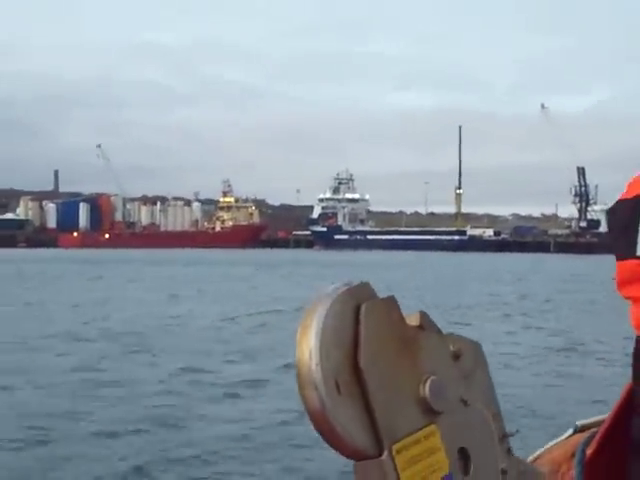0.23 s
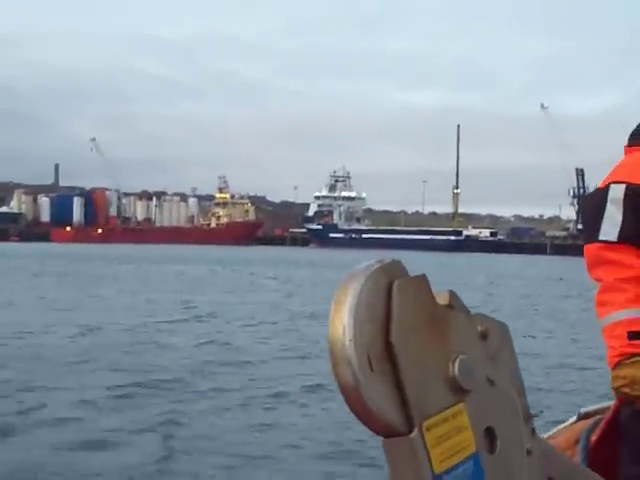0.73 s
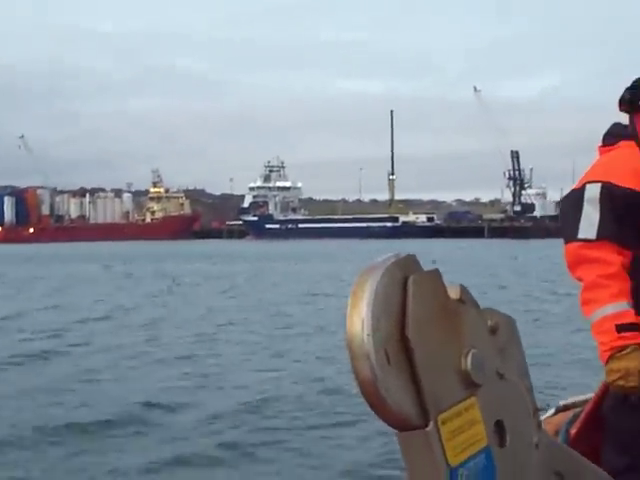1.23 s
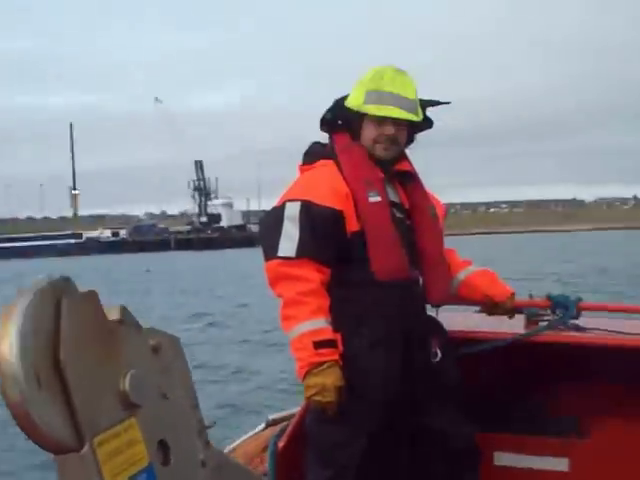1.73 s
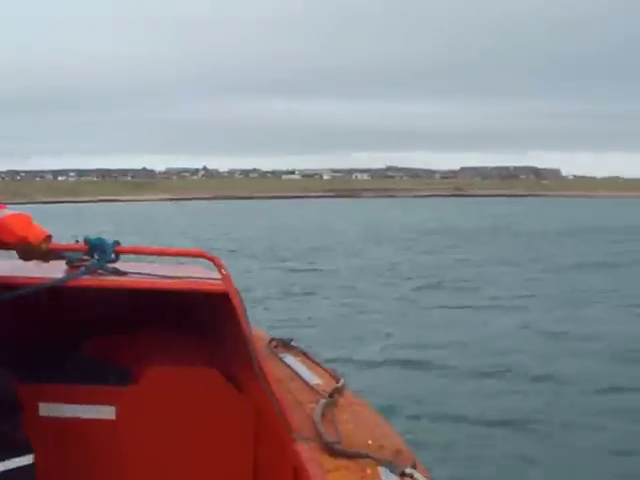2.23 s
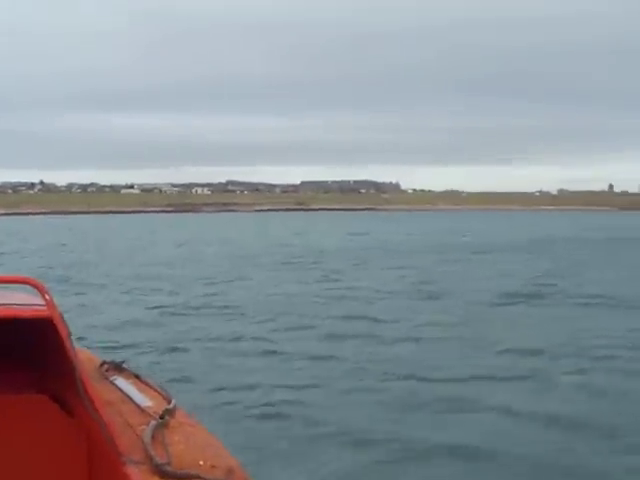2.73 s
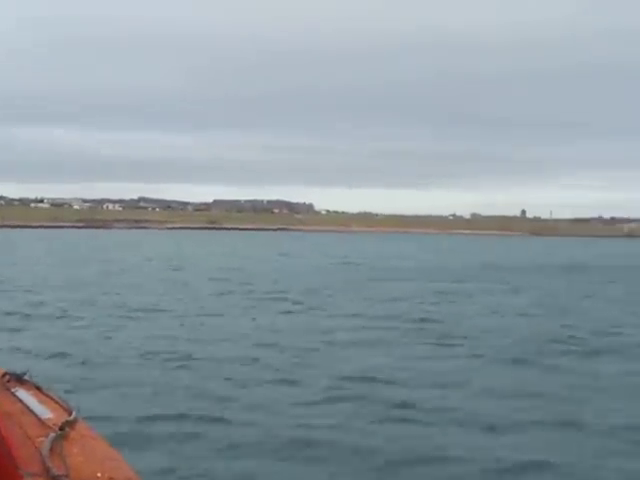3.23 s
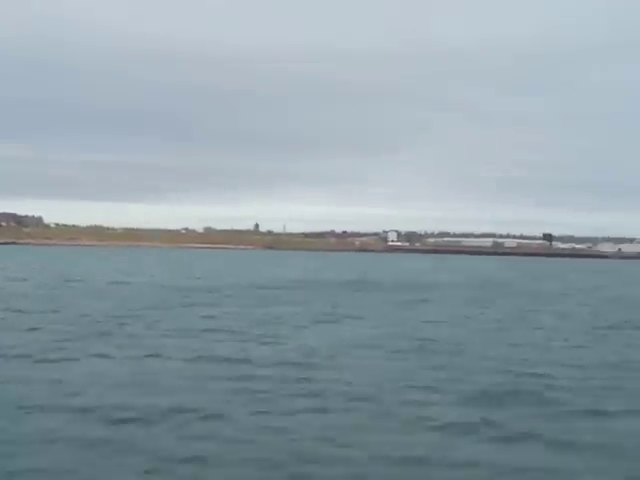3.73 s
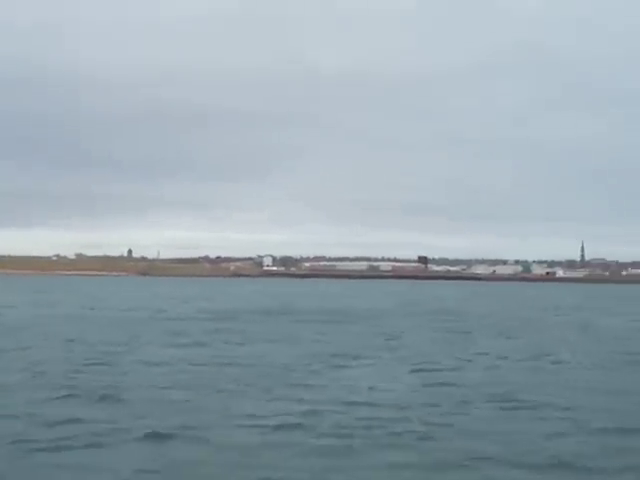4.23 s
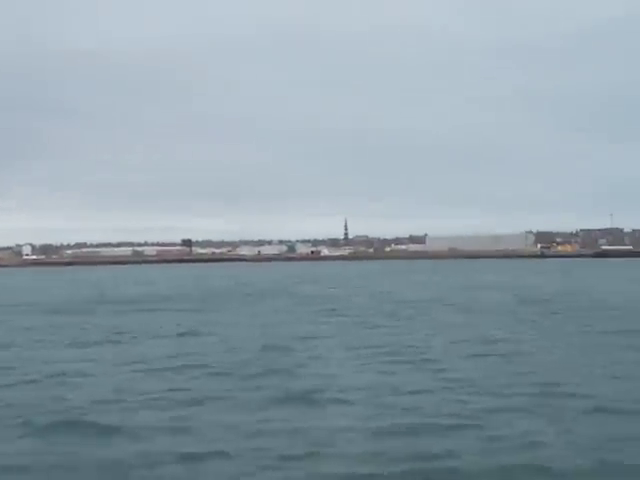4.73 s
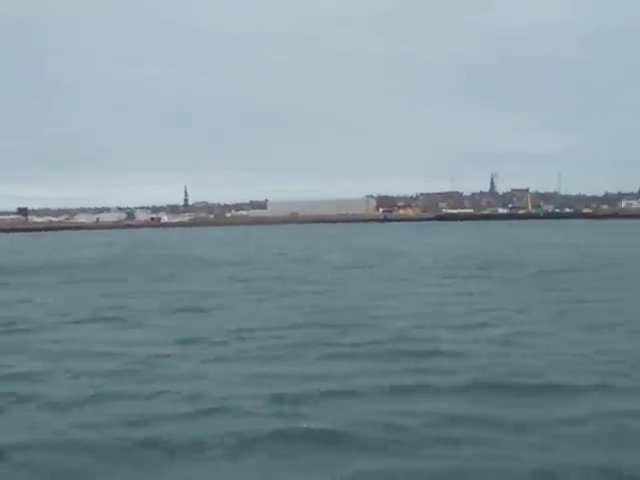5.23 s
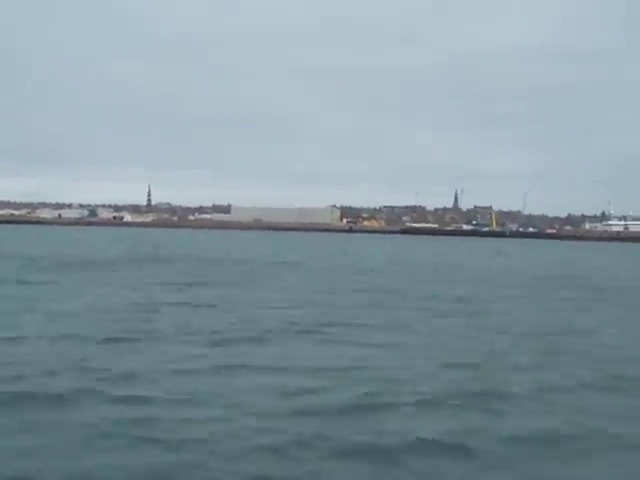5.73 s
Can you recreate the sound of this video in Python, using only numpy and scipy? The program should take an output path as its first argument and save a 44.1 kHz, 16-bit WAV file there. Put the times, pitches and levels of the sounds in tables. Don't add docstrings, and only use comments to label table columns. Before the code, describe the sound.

Harsh wind buffeting breaks into dense pops and brief dropouts, while a diesel boat motor and rushing spray surface mainly in short lulls.

```python
import sys
import numpy as np
from scipy import signal
from scipy.io import wavfile
from scipy.ndimage import uniform_filter1d, map_coordinates

SR = 44100
rng = np.random.default_rng(int(sys.argv[2]) if len(sys.argv) > 2 else 0)


def field_ratio(decibels):
    return 10 ** (np.asarray(decibels, dtype=float) / 20)


def wav_out(sig):
    wavfile.write(sys.argv[1], SR, np.round(np.clip(np.atleast_2d(sig).T, -1, 1) * 32767).astype(np.int16))


N = 263277
RAIL = 0.84

# (time [s], turbulence level [dB])
GUST = [(0.0, -4.5), (0.65, -3.5), (0.85, -16), (1.15, -19), (1.3, -10.5), (1.5, -28), (1.65, -8),
        (1.88, -8.5), (2.05, -14), (2.3, -24.5), (2.75, -16), (3.62, -20.5), (3.78, -11.5), (4.25, -6.5),
        (5.0, -10.5), (5.55, -8.5), (5.72, -21.5), (5.9, -8)]
# (time [s], level [dB])
WHIPS = [(0.1555, -6), (0.568, -15), (1.3677, -22), (1.636, -17.5), (1.7382, -18.5), (3.7553, -13.5),
         (3.9669, -15), (3.8622, -16), (4.168, -7.5), (4.3962, -10.5), (4.4258, -11.5), (4.5162, -14.5),
         (4.665, -18.5), (4.7863, -8.5), (4.8219, -15), (4.972, -8.5), (4.9912, 4), (5.0135, -12),
         (5.0325, -6.5), (5.058, -11), (5.0972, -12), (5.114, -14), (5.243, -3), (5.275, -15.5),
         (5.3189, -19.5), (5.3676, -10.5), (5.428, -29), (5.4692, -6.5), (5.482, -18), (5.5223, -12)]


def unit(x):
    return x / np.sqrt(np.mean(x ** 2) + 1e-20)


def along(points, hz):
    f, v = np.transpose(points)
    return np.interp(np.log(hz + 1), np.log(f + 1), v)


def curve(rows):
    return np.interp(np.arange(N) / SR, *np.transpose(rows))


def wobble(rate_hz):
    knots = rng.standard_normal(int(N * rate_hz / SR) + 4)
    return map_coordinates(knots, [np.arange(N) * rate_hz / SR])


def rush(spectrum, patchy_db):
    hz, _, z = signal.stft(rng.standard_normal(N + 512), SR, nperseg=512)
    patches = uniform_filter1d(rng.standard_normal(z.shape), 5, 0)
    patches = uniform_filter1d(patches, 8, 1)
    z = z * field_ratio(patchy_db * unit(patches) + along(spectrum, hz)[:, None])
    return unit(signal.istft(z, nperseg=512)[1][:N])


def holds():
    # (time [s], length [s])
    held_high = [(0.4399, 0.0269), (1.2666, 0.0224), (1.5422, 0.018), (1.7805, 0.021), (2.0484, 0.0293),
                 (2.6224, 0.024), (2.742, 0.031), (2.8705, 0.0173), (2.969, 0.0347), (3.175, 0.0322),
                 (3.2926, 0.028), (3.4743, 0.0345), (3.6402, 0.0411), (3.7788, 0.0175), (3.8642, 0.0306),
                 (3.9213, 0.0445), (4.0158, 0.0251), (4.0896, 0.0225), (4.1711, 0.0275), (4.2626, 0.0228),
                 (4.426, 0.0234), (4.5183, 0.0288), (4.5976, 0.0269), (4.7247, 0.0183), (4.8882, 0.0385),
                 (5.1773, 0.0322), (5.3303, 0.0294), (5.5736, 0.0305), (5.8303, 0.0188), (5.9505, 0.0205)]
    # (time [s], length [s])
    held_low = [(1.4851, 0.0174), (1.6557, 0.0171), (2.0261, 0.0156), (2.0841, 0.02), (2.1307, 0.0191),
                (2.4331, 0.0198), (2.4948, 0.0249), (2.6513, 0.037), (2.7754, 0.0313), (2.8974, 0.0311),
                (3.01, 0.0165), (3.0579, 0.0392), (3.2464, 0.0333), (3.335, 0.0317), (3.5131, 0.0253),
                (3.5498, 0.0289), (3.6858, 0.0283), (3.7989, 0.0565), (3.9034, 0.0158), (4.06, 0.028),
                (4.1271, 0.0415), (4.627, 0.0332), (4.9433, 0.022), (5.0358, 0.0202), (5.1265, 0.0211),
                (5.2871, 0.0157), (5.3861, 0.0259), (5.5037, 0.0156), (5.6052, 0.032), (5.9191, 0.0161)]
    # (time [s], length [s], rail [1 upper, -1 lower])
    held_shorter = [(0.1164, 0.0144, 1), (1.2484, 0.0125, -1), (1.3683, 0.0146, 1), (1.5284, 0.0122, -1),
                    (1.5611, 0.013, 1), (2.1103, 0.0123, 1), (2.3549, 0.0157, 1), (2.3774, 0.014, -1),
                    (2.4043, 0.0171, 1), (2.4533, 0.0144, -1), (2.4694, 0.016, 1), (2.5227, 0.0137, 1),
                    (2.7075, 0.0147, -1), (3.0368, 0.0158, 1), (3.2171, 0.0151, -1), (3.459, 0.0131, -1),
                    (3.718, 0.0132, 1), (3.7623, 0.0154, 1), (3.9673, 0.0141, 1), (4.2416, 0.0146, -1),
                    (4.3663, 0.013, 1), (4.382, 0.0132, -1), (4.4651, 0.0139, -1), (4.4886, 0.0128, -1),
                    (4.5488, 0.0136, -1), (4.9764, 0.0161, 1), (5.0999, 0.0125, 1), (5.2545, 0.0134, 1),
                    (5.7914, 0.0161, 1), (5.8091, 0.0122, -1)]
    # (time [s], length [s])
    lulls = [(0.1414, 0.018), (0.2162, 0.0337), (0.2528, 0.0202), (0.3261, 0.0478), (0.5289, 0.0176),
             (0.5583, 0.0161), (0.6322, 0.0163), (0.6632, 0.0178), (0.7891, 0.0655), (0.8591, 0.0298),
             (0.8931, 0.0197), (0.9388, 0.1602), (1.1045, 0.1326), (1.411, 0.0172), (1.4327, 0.0432),
             (1.7258, 0.0159), (1.8015, 0.0165), (1.8734, 0.0172), (1.9306, 0.0193), (2.1498, 0.0169),
             (2.2397, 0.0932), (2.5727, 0.0194), (3.1153, 0.0597), (3.378, 0.0247), (3.5909, 0.0333),
             (4.8314, 0.0269), (5.2387, 0.0158), (5.412, 0.0262), (5.4413, 0.0196), (5.6452, 0.0981)]
    # (time [s], gap [s])
    swing = [(0, .0022), (.75, .003), (1, .007), (1.6, .003), (2.2, .006), (3.5, .004), (4, .0024),
             (5, .003), (6, .0035)]
    # (from [s], to [s])
    squalls = [
        (0, .75),
        (1.7, 1.83),
        (5.2, 5.47),
    ]
    touch_s, longest_touch_s, whip_frees_s = .0056, .0095, .005
    scatter, cross = .6, .65
    slap_s, slap_held = .0033, .5
    room = 16

    marks = [(*row, 1) for row in held_high] + [(*row, -1) for row in held_low] + list(held_shorter)
    marks += [(*row, 0) for row in lulls]
    marks += [(s - whip_frees_s / 2, whip_frees_s, 0) for s, _ in WHIPS]
    marks = sorted(marks)

    chance = np.exp(scatter * rng.standard_normal((len(marks), room, 2))) * [1, touch_s]
    chance[..., 0] *= np.interp([row[0] for row in marks], *np.transpose(swing))[:, None]
    chance[..., 1] = np.minimum(chance[..., 1], longest_touch_s)
    uneven = np.exp(scatter / 2 * rng.standard_normal((len(marks), room)))
    flips = np.where(rng.random((len(marks), room)) < cross, -1, 1)

    held, t, rail, after_lull = [], 0, 1, True
    for (s, length, side), steps, flip, slaps in zip(marks, chance, flips, uneven):
        free = int(side == 0)
        steps = np.append(0 if after_lull else steps[0, 0], steps.ravel()[1:])
        ends = np.cumsum(steps)[free::2]
        last = 2 * np.argmin(abs(ends - (s - t))) + free
        last = 2 if last == 0 and after_lull else last
        if s - t > .001:
            edges = t + np.cumsum(steps[:last + 1]) * (s - t) / steps[:last + 1].sum()
            for k in range((last + 1) // 2):
                rail = rail * flip[k]
                held.append((edges[2 * k], edges[2 * k + 1], rail))
        if side:
            held.append((s, s + length, side))
        elif length > whip_frees_s and any(a < s < b for a, b in squalls):
            for k, late in enumerate(np.cumsum(slap_s * slaps)):
                if late + slap_s < length:
                    rail = -rail
                    slap_end = s + late + slap_held * slap_s * slaps[(k + 1) % room]
                    held.append((s + late, slap_end, rail))
        t, rail, after_lull = max(t, s + length), side or rail, side == 0
    return held


def turbulence(trim_db, whip_db, whip_s=0.0013):
    # (frequency [Hz], level [dB per Hz])
    eddy_colour = [(30, -18.5), (90, -4), (250, -1), (600, -10.5), (1500, -18.5), (4000, -61),
                   (12000, -86.5)]
    # (frequency [Hz], level [dB per Hz])
    flutter_colour = [(200, -20), (600, 0), (2000, -3), (4200, -16), (7000, -18), (10000, -30)]
    t = np.arange(N) / SR
    gain_db = trim_db + 1.507 * curve(GUST) + 4.9 * wobble(60)
    eddies = field_ratio(gain_db) * rush(eddy_colour, patchy_db=2.5)
    whips = sum(field_ratio(db + whip_db) * np.exp(-((t - s) / whip_s) ** 2) for s, db in WHIPS)
    return eddies + whips * rush(flutter_colour, patchy_db=3.5)


def wind(rails_per_s=900, deepest=1.62, settle_s=0.017, grip_s=0.00078, beyond=2.5):
    pin, free, rail = np.transpose(holds())
    next_pin = np.append(pin[1:], N / SR + .01)
    next_rail = np.append(rail[1:], rail[-1])
    open_s = np.maximum(next_pin - free, .0002)
    force = field_ratio(.5 * (np.interp(free, *np.transpose(GUST)) + 17.5))
    edge_s = np.minimum(0.49 * (free - pin), .0006)
    travel_s = np.minimum(0.52 * open_s, 0.0019 / force)
    brief = np.exp(-open_s / settle_s)
    turned = rail * (1 - np.minimum(rails_per_s * open_s, deepest))
    middle = np.where(rail == next_rail, turned * brief, 0)

    def joined(times, values):
        times = np.maximum.accumulate(np.ravel(times, "F"))
        return curve(np.transpose([times, np.ravel(values, "F")]))

    slow = joined([pin, pin + edge_s, free - edge_s, free, free + travel_s, next_pin - travel_s],
                  [rail, beyond * rail, beyond * rail, rail, middle, middle])
    loose = joined([pin, free, free + open_s / 2], [0 * pin, 0 * pin, open_s / 2 / grip_s])
    rough = turbulence(trim_db=7.5, whip_db=5) + 0.32 * wobble(30) + .2 * wobble(170)
    return RAIL * slow + np.minimum(loose, 1) * rough


def engine(level_db, uneven_db):
    # (time [s], turns [Hz])
    shaft = [
        (0, 28.33),
        (3.2, 28.12),
        (5.6, 28.28),
        (6, 28.97),
    ]
    # (multiple of shaft speed, level [dB])
    whines = [(12, -22.5), (20, -29), (40, -38), (57, -39), (94, -48.5)]
    # (frequency [Hz], level [dB])
    exhaust = [(60, -12.5), (170, 4.5), (340, -2), (520, -8.5), (850, -10), (1400, -30), (2100, -22.5),
               (3000, -58.5)]
    turn = 2 * np.pi * np.cumsum(curve(shaft) * (1 + 0.000917 * wobble(6))) / SR
    out = sum(field_ratio(db) * np.sqrt(2) * np.sin(k * turn) for k, db in whines)
    for k in sorted(set(range(3, 76)) - set(dict(whines))):
        weak_db = 0 if k % 3 == 0 else uneven_db
        order_db = level_db + weak_db + along(exhaust, k * shaft[0][1]) + rng.normal(0, 0.85)
        out = out + field_ratio(order_db) * np.sin(k * turn + rng.uniform(0, 2 * np.pi))
    return out * field_ratio(wobble(7.2))


def spray(level_db):
    # (frequency [Hz], level [dB per Hz])
    hull_colour = [(60, -4), (200, 0), (400, -7), (900, -15), (1700, -19.5), (2800, -22.5), (3600, -34),
                   (4170, -38), (4800, -35), (6000, -31), (7500, -29.5), (8000, -36), (8600, -36)]
    return field_ratio(level_db + 0.27 * wobble(38)) * rush(hull_colour, patchy_db=0.0)


def scene():
    return (wind() + engine(level_db=-19, uneven_db=-8) + spray(level_db=-17.5))[None]


def low_pass(x):
    return signal.sosfilt(signal.butter(12, 16830, fs=SR, output="sos"), x)


def record(dry):
    railed = np.clip(dry, -RAIL, RAIL)
    railed = railed - railed[:, :1]
    x = railed - .82 * signal.lfilter(*signal.iirpeak(4200, 4.5, SR), railed)
    x = signal.sosfilt(signal.cheby2(14, 80, 9600, fs=SR, output="sos"), x)
    x = signal.sosfilt(signal.butter(2, 433, "high", fs=SR, output="sos"), x)
    x = np.clip(x, -.705, .705)
    smooth = signal.sosfiltfilt(signal.cheby2(12, 30, 9200, fs=SR, output="sos"), x)
    x = smooth + field_ratio(-11) * (x - smooth)
    x = x + field_ratio(-68) * wobble(5)
    x = signal.sosfiltfilt(signal.cheby2(12, 40, 16830, fs=SR, output="sos"), x)
    return low_pass(x)


dry = scene()
out = record(dry)
wav_out(out)
```